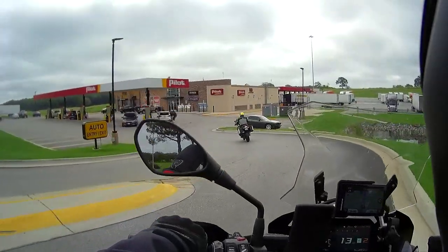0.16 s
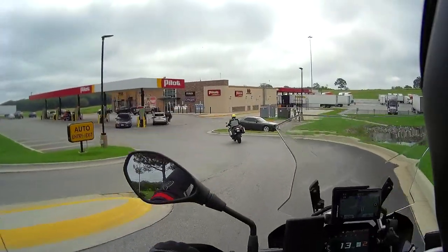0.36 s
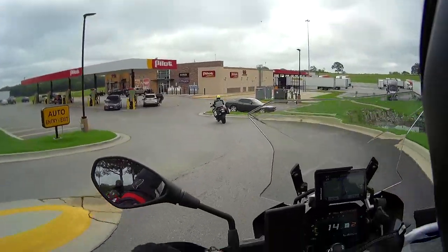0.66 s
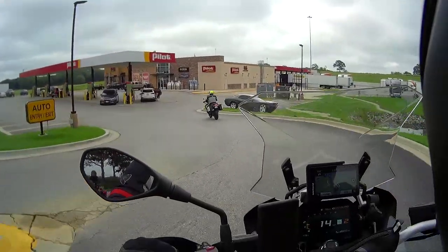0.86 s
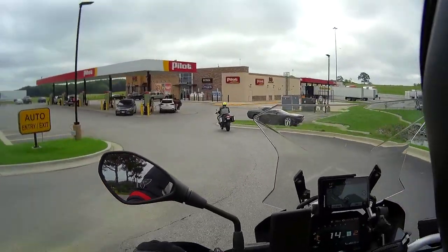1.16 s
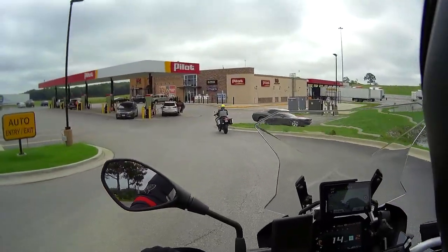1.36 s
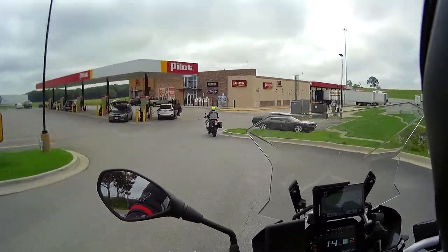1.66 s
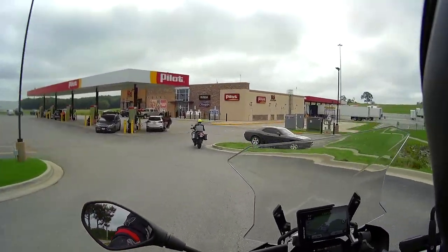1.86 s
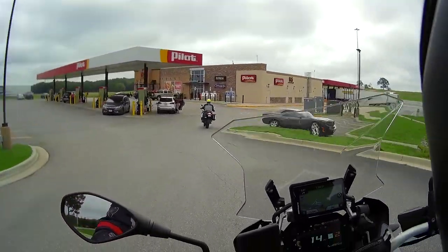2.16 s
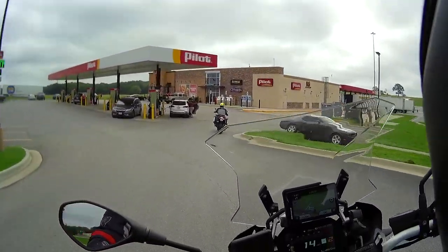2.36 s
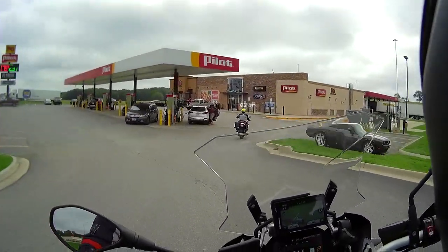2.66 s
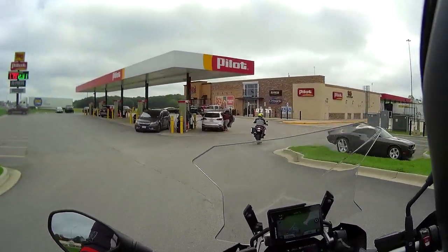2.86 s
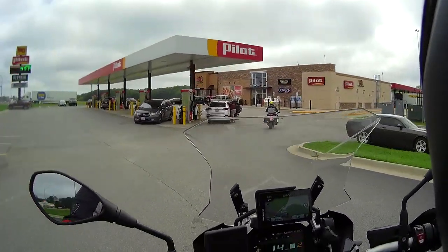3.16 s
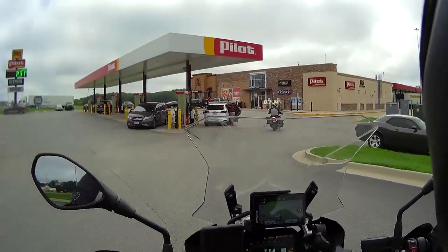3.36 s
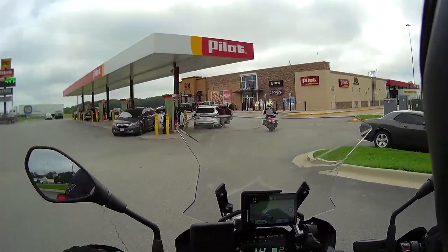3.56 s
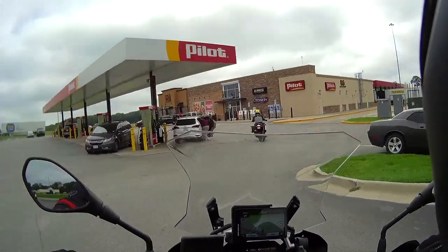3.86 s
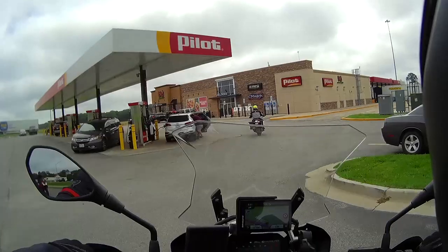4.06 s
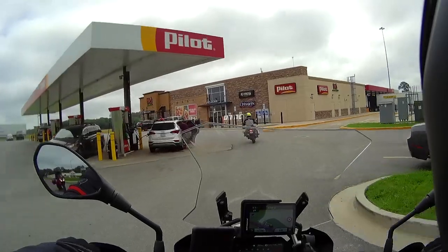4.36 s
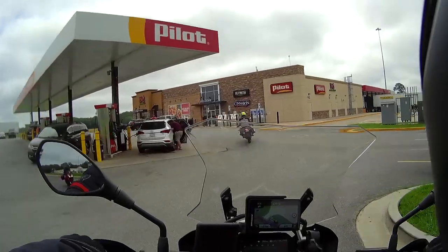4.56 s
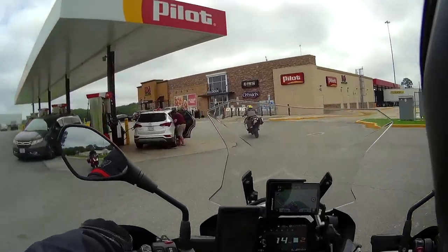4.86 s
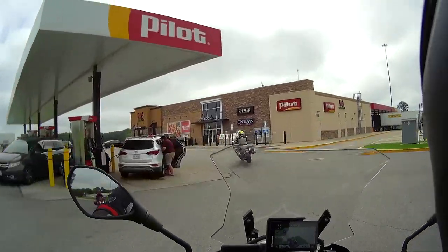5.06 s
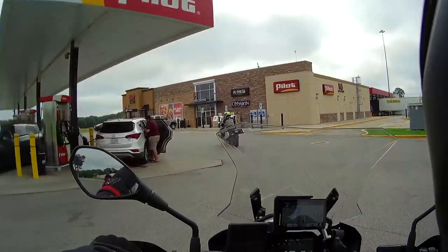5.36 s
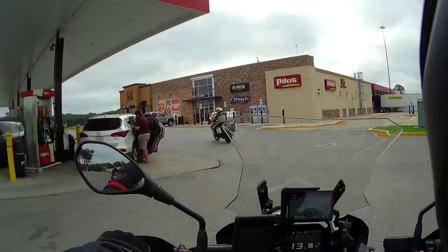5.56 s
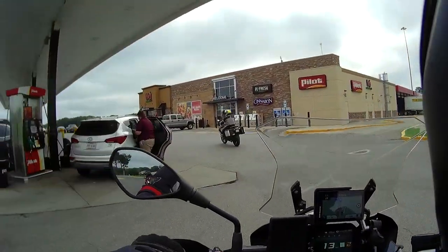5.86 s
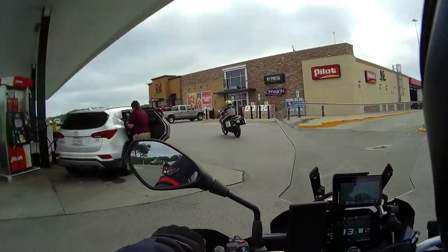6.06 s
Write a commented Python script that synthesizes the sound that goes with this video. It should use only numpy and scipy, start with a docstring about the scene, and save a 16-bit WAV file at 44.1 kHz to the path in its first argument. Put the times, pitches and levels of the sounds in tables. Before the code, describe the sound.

Wind buffets a helmet microphone while a motorcycle rolls at low revs, briefly easing off the throttle and finally dropping to idle.

```python
"""A twin-cylinder motorcycle rolls along, heard from the rider's helmet. The throttle eases off and
reopens, and later the engine sinks to idle. Firing pulses throb through the exhaust pipe, the valve
gear clatters, the covers ring and a gear whines in time with the crank. Wind rumbles over the
microphone and slaps it with single eddies, above a smooth hiss of air and tyres."""
import sys
import numpy as np
from scipy import signal
from scipy.fft import rfft, irfft
from scipy.io import wavfile
from scipy.ndimage import uniform_filter1d

SR = 44100
rng = np.random.default_rng(int(sys.argv[2]) if len(sys.argv) > 2 else 0)


def transcribe(u):
    """Save the signal u as a 16-bit wav file named by the first command-line argument.

    u: samples, shape (n,) or (channels, n), limited to [-1, 1]; the rate is SR.
    q: integer samples, one column per channel.
    """
    v = np.clip(np.atleast_2d(u).T, -1, 1)
    q = np.round(v * 32767).astype(np.int16)
    wavfile.write(sys.argv[1], SR, q)


N = 273420

# Engine speed. Each row: time in seconds, revolutions a minute.
ENGINE_RPM = [(0, 1486), (.6, 1636), (1.0, 1630), (1.4, 1680), (2.4, 1676), (3.4, 1655), (4.25, 1614),
              (4.8, 1550), (5.0, 1278), (5.2, 1165), (5.8, 1202), (6.2, 1172)]
# The throttle ride. Each row: time in seconds, opening from 0 to 1.
THROTTLE_OPENING = [(0, 1), (.55, 0.85), (1.58, 0.88), (1.72, 0.22), (1.92, .1), (2.08, 0.34), (2.4, .55),
                    (2.6, 0), (2.8, 0.57), (2.93, 0.24), (3.1, 0.74), (4.4, 0.77), (5.1, 0.57), (5.9, .56),
                    (6.2, 0.68)]
# Tone of the exhaust's boom, and of the growl an open throttle adds.
# Each row: frequency in Hz, relative level in dB.
BOOM_EQ = [(14, -39.5), (27, 2), (56, 6), (84, 2.5), (112, -4), (140, -8.5), (168, -22), (200, -12.5),
           (250, -14.5), (285, -8), (340, -39), (560, -29.5), (1000, -60.5), (3000, -102)]
GROWL_EQ = [(25, -36.5), (55, -4.5), (82, 2), (108, 8), (135, -5), (165, -4), (215, -2.5), (265, -2.5),
            (350, -18.5), (450, -14.5), (600, -11.5), (720, -12.5), (850, -23), (3000, -64.5)]
# Echoes in header, silencer and tail pipe. Each row: round trip in seconds, share reflected.
PIPE_ECHOES = [(.0031, 0.39), (.0073, 0.53), (0.012, 0.48)]
# Knocks in one engine cycle. Each row: place and half length as shares of the cycle, relative level in dB.
CYCLE_KNOCKS = [(.07, 0.077, -9), (.17, 0.06, 3), (.30, 0.12, -16), (.65, 0.077, -4)]
# Tone of the clatter. Each row: frequency in Hz, relative level in dB.
CLATTER_EQ = [(150, -24), (500, 19), (750, 9), (1050, 15.5), (1500, 21), (1900, 5), (2900, 2), (3700, -1),
              (4900, -17), (5900, -1.5), (7700, -5), (9400, 3), (11500, -2), (15000, -10)]
# Ringing engine parts. Each row: pitch in Hz, filter width in Hz, place in the cycle from 0 to 1,
# level under load in dB, level at idle in dB.
COVER_RINGS = [(498, 104, 0.09, -55.5, -51.5), (680, 120, 0.07, -58, -63), (1403, 300, 0.06, -64.5, -69),
               (2320, 110, 0.17, -72, -70), (2337, 150, 0.69, -79, -67), (4840, 650, 0.06, -75.5, -75),
               (9256, 1900, 0.16, -69.5, -75)]
# Gear whine, loudest as the engine drags down. Each row: time in seconds, level in dB.
WHINE_LEVEL = [(0, -80), (1.1, -78), (2.2, -86), (3.1, -75), (4.45, -73), (4.83, -67.5), (4.95, -84),
               (6.2, -90)]
# The air stream over the helmet. Each row: time in seconds, level in dB.
STREAM_LEVEL = [(0, -33.5), (.6, -32), (1.3, -36.5), (1.75, -43), (2.25, -33.5), (2.66, -40.5),
                (2.8, -34.5), (3.1, -21.5), (3.7, -28.5), (4.2, -34.5), (5.1, -29.5), (5.45, -32),
                (6.2, -28)]
# Gusts swelling out of the stream. Each row: peak time in seconds, half length in seconds,
# then rumble and buffeting as relative levels in dB.
WIND_GUSTS = [(0.006, 0.033, -18.5, -22), (0.276, 0.033, -26, -37.5), (0.716, 0.038, -27, -27.5),
              (0.816, 0.04, -19.5, -24), (0.961, 0.042, -28.5, -31), (1.081, 0.016, -23, -35.5),
              (1.199, 0.015, -25, -31.5), (1.413, .035, -27.5, -33.5), (2.736, 0.013, -19.5, -26.5),
              (2.802, 0.036, -26, -32), (3.196, 0.13, -44, -35.5), (3.492, 0.028, -31, -30),
              (3.585, 0.019, -26, -38), (4.024, 0.024, -29, -34.5), (4.28, 0.025, -29, -43),
              (4.588, 0.065, -30, -38.5), (4.772, 0.018, -41, -35.5), (4.884, 0.045, -31, -35.5),
              (5.611, 0.019, -18, -28), (5.693, 0.022, -22, -27.5), (5.825, 0.03, -22.5, -36),
              (5.963, 0.018, -22.5, -29.5), (6.19, 0.024, -21, -28.5)]
# The strongest eddies. Each row: time in seconds, then body, crack and low push as relative levels in dB.
EDDY_SLAPS = [(.698, -13.5, -31.5, -14), (.802, -18, -31, -16), (0.819, -17, -28, -18),
              (.846, -17.5, -35, -19), (0.8944, -13.5, -27.5, -8), (0.899, -11.5, -32.5, -29),
              (.981, -22.5, -43, -11), (1.248, -26, -52, -18.5), (2.717, -23, -48, -19),
              (2.790, -14.5, -44, -6), (3.166, -19, -17.5, -26), (3.175, -16.5, -27, -25),
              (3.239, -16, -35, -14), (3.262, -18, -35, -20), (3.462, -19.5, -36, -27),
              (3.904, -24, -41, -32), (4.012, -15.5, -35, -33), (4.393, -22, -53, -19.5),
              (4.83, -21.5, -34.5, -30), (4.845, -17, -31, -34), (4.882, -21, -36, -33),
              (5.688, -16, -31, -14), (5.951, -24, -51, -21), (5.972, -21, -39, -28)]
# Tone of the wind's rumble and buffeting, an eddy's puff and crack, and the background hiss.
# Each row: frequency in Hz, relative level in dB.
RUMBLE_EQ = [(8, -56), (18, 4.5), (30, -3.5), (60, 1), (110, -2.5), (160, -7.5), (240, -22.5), (450, -31.5),
             (1200, -89.5)]
BUFFET_EQ = [(50, -33.5), (130, 3), (230, 4.5), (330, 0), (450, -5.5), (700, -12), (1050, -19.5),
             (1600, -25), (2300, -41.5), (3200, -44.5), (6000, -71), (12000, -88)]
PUFF_EQ = [(50, -10), (150, 5), (280, 1.5), (500, 3.5), (750, -4), (1000, -13), (1800, -40), (3500, -63),
           (8000, -100)]
CRACK_EQ = [(500, -24), (1200, 8.5), (1700, 8.5), (2050, 2), (2500, 0.5), (3200, -18), (4600, -16),
            (5600, -50), (12000, -73)]
HISS_EQ = [(150, 1.5), (600, 25.5), (1000, 20.5), (1600, 16), (2200, 12), (3000, 3), (3900, 3), (4700, 4.5),
           (6100, 0), (9500, 5), (12700, 0), (14000, -6), (15000, -15)]


def exhaust(cycle, idle, uneven=0.14, scatter=.13, jitter_cycles=.008):
    """Two firings a cycle, never quite alike, boom through the pipe; the throttle makes them growl."""
    load = throttle()
    stumble = jitter_cycles * (1 - load) * wander(20)  # timing loosens as the throttle shuts
    firing = np.floor(2 * (cycle + stumble))
    at = np.flatnonzero(np.diff(firing))
    pulses = np.zeros(N)
    pulses[at] = 1 + uneven * (-1) ** firing[at] + scatter * rng.standard_normal(N)[at]
    pulses = pipe_echoes(pulses)
    boom = unit_rms(colour(pulses, BOOM_EQ)) * gain_of(-38 - idle + 4 * load)
    growl = unit_rms(colour(pulses, GROWL_EQ)) * load ** 1.17 * gain_of(-35.5)
    return boom + growl


def pipe_echoes(pulses):
    """Each pulse bounces to and fro in the pipe and comes out smeared."""
    hz = np.fft.rfftfreq(2 * N, 1 / SR)
    spectrum = rfft(pulses, 2 * N)
    for trip_s, share in PIPE_ECHOES:
        delay = np.exp(-2j * np.pi * hz * trip_s)
        spectrum = spectrum * (delay - share) / (1 - share * delay)  # all-pass
    return irfft(spectrum, 2 * N)[:N]


def clatter(cycle, grit_db=4, level_db=-64, load_db=12):
    """Valves, pistons and gears knock at fixed crank angles, harder under load."""
    knocks = .36 + sum(gain_of(db) * burst(cycle, place, length) for place, length, db in CYCLE_KNOCKS)
    rattle = knocks * gain_of(grit_db * wander(410)) * rng.standard_normal(N)
    return unit_rms(colour(rattle, CLATTER_EQ)) * gain_of(level_db + load_db * throttle())


def ringing_covers(cycle, idle, sustain=0.26):
    """Covers ring as they are struck, once a cycle; the tappets stand out at idle."""
    out = np.zeros(N)
    for hz, width, place, load_db, idle_db in COVER_RINGS:
        b, a = signal.iirpeak(hz, hz / width, SR)
        band = signal.lfilter(b, a, rng.standard_normal(N))
        ring = steadied(signal.lfilter(b, a, band), size=700)
        strikes = sustain + burst(cycle, place, length=0.05)
        out += unit_rms(ring * strikes) * gain_of(load_db + (idle_db - load_db) * idle)
    return out


def gear_whine(cycle, teeth_per_turn=178.5, flutter_db=4.5):
    """Gear teeth sing at a multiple of the crank speed, hardest once a cycle; backlash adds roughness."""
    backlash = .009 * wander(160)
    crank_turns = 2 * np.cumsum(np.gradient(cycle) * (1 + backlash))
    tone = np.sin(2 * np.pi * teeth_per_turn * crank_turns)
    accent = .45 + burst(cycle, place=0.56, length=0.11)
    return unit_rms(tone * accent) * gain_of(follow(WHINE_LEVEL) + flutter_db * wander(60))


def airflow(buffet_db=-10, unrest_db=2, unrest_hz=16):
    """Envelopes for the rumble and the buffeting: a restless stream plus bell-shaped gusts."""
    t = np.arange(N) / SR
    stream = gain_of(follow(STREAM_LEVEL) + unrest_db * wander(unrest_hz))
    rumble_power, buffet_power = stream ** 2, (stream * gain_of(buffet_db)) ** 2
    for peak_s, half_s, low_db, mid_db in WIND_GUSTS:
        swell = np.exp(-((t - peak_s) / half_s) ** 2)
        rumble_power += swell * gain_of(low_db) ** 2
        buffet_power += swell * gain_of(mid_db) ** 2
    return np.sqrt(rumble_power), np.sqrt(buffet_power)


def wind(rumble_gain, buffet_gain, lumpy_db=3.5):
    """Large eddies rumble; small ones arrive in clumps and buffet the microphone."""
    rumble = steadied(colour(rng.standard_normal(N), RUMBLE_EQ), size=2200)
    eddies = gain_of(lumpy_db * wander(177)) * rng.standard_normal(N)
    buffet = steadied(colour(eddies, BUFFET_EQ), size=1800)
    return rumble * rumble_gain * gain_of(-0.14) + buffet * buffet_gain * gain_of(0.5)


def slaps(rows, puff_s=0.0029, crack_s=.001, core_s=0.00088, push_s=0.0017, size=2048):
    """Each eddy has a tight core in a wide swirl, a short puff, and a crack where the air tears off."""
    t = (np.arange(size) - size // 4) / SR
    out = np.zeros(N)
    for time_s, body_db, crack_db, push_db in rows:
        body, edge = rng.standard_normal((2, size))
        stretch = rng.uniform(.85, 1.2)
        puff = steadied(colour(body, PUFF_EQ), size=130) * np.exp(-np.hypot(t, puff_s / 2) / puff_s)
        crack = steadied(colour(edge, CRACK_EQ), size=40) * np.exp(-np.hypot(t, crack_s / 2) / crack_s)
        slap = gain_of(body_db - 3.5) * eddy_pressure(t, core_s * stretch)
        slap += gain_of(body_db - 2) * puff / np.abs(puff).max()
        slap += gain_of(crack_db) * crack / np.abs(crack).max()
        slap += gain_of(push_db - 4) * eddy_pressure(t, push_s * stretch)
        add(out, time_s + t[0], slap * signal.windows.tukey(size, .2))
    return out


def eddy_pressure(t, width_s):
    """A passing eddy sucks, then pushes, with a peak of 1."""
    return t / width_s * np.exp(.5 - (t / width_s) ** 2 / 2)


def stray_eddies(buffet_gain, count=30, spread_db=6):
    """Lesser slaps land at random and ride the level of the buffeting; rows as in EDDY_SLAPS."""
    when, luck = rng.random((count, 2)).T
    level_db = 20 * np.log10(buffet_gain[(when * N).astype(int)]) + spread_db * (2 * luck - 1)
    return list(zip(when * N / SR, level_db + 8.5, level_db - 12, level_db + 8))


def road_hiss(flutter_db=0.6, level_db=-55, load_db=9.5):
    """A smooth bed of air and tyre hiss that swells with the throttle."""
    hiss = unit_rms(colour(rng.standard_normal(N), HISS_EQ))
    return hiss * gain_of(level_db + load_db * throttle() + flutter_db * wander(40))


def throttle():
    """The throttle opening at every sample."""
    return np.clip(follow(THROTTLE_OPENING), 0, 1)


def burst(cycle, place, length):
    """A bump that returns at the same crank angle in every cycle."""
    return np.exp(-(((cycle - place + .5) % 1 - .5) / length) ** 2)


def gain_of(db):
    """Decibels to a gain."""
    return 10 ** (np.asarray(db) / 20)


def unit_rms(x):
    """Scales to rms 1."""
    return x / np.sqrt(np.mean(x ** 2) + 1e-20)


def follow(rows):
    """An automation curve, read at every sample."""
    times, values = np.transpose(rows)
    return np.interp(np.arange(N) / SR, times, values)


def colour(x, eq, size=8192):
    """Shapes x with a minimum-phase EQ curve."""
    hz, db = np.transpose(eq)
    bins = np.abs(np.fft.fftfreq(size, 1 / SR))
    log_gain = np.log(gain_of(np.interp(np.log(bins + 1), np.log(hz), db)))
    response = np.exp(np.conj(signal.hilbert(log_gain)))
    taps = np.fft.ifft(response).real[:size // 2]
    return signal.fftconvolve(x, taps)[:len(x)]


def wander(hz):
    """Random drift of rms 1, up to about the given rate."""
    bins = np.fft.rfftfreq(N, 1 / SR)
    return unit_rms(irfft(rfft(rng.standard_normal(N)) * np.exp(-(bins / hz) ** 2), N))


def steadied(x, size):
    """Levels out swells longer than size samples."""
    power = uniform_filter1d(uniform_filter1d(x ** 2, size), size)
    return x / np.sqrt(np.abs(power) + 1e-20)


def add(mix, start_s, sound):
    """Mixes a sound in at a time."""
    part = mix[max(round(start_s * SR), 0):][:len(sound)]
    part += sound[:len(part)]


def scene():
    """Engine, wind and road hiss in a mono mix."""
    rpm = follow(ENGINE_RPM)
    cycle = np.cumsum(rpm) / 120 / SR  # one engine cycle is two crank turns
    idle = np.clip((1550 - rpm) / 350, 0, 1)  # 0 under way, 1 at idle
    engine = exhaust(cycle, idle) + clatter(cycle) + ringing_covers(cycle, idle) + gear_whine(cycle)
    rumble_gain, buffet_gain = airflow()
    air = road_hiss() + wind(rumble_gain, buffet_gain)
    eddies = slaps(list(EDDY_SLAPS) + stray_eddies(buffet_gain))
    return (engine + air + eddies)[None]


def record(dry):
    """A steep low-pass trims the top treble."""
    cutoff_hz = 14700
    taps = signal.firwin(201, cutoff_hz, window=("kaiser", 9), fs=SR)
    return signal.oaconvolve(dry, taps[None], "same", axes=1)


dry = scene()
out = record(dry)
transcribe(out)
```